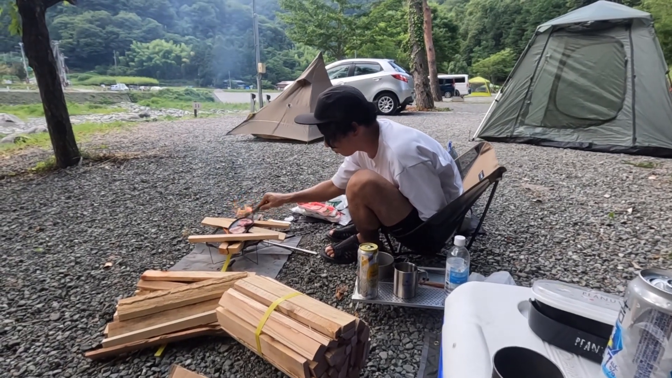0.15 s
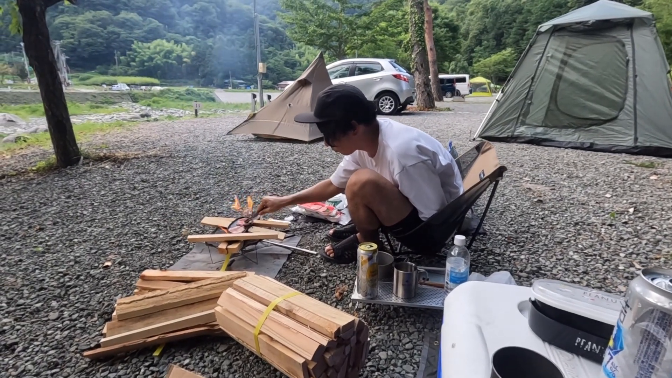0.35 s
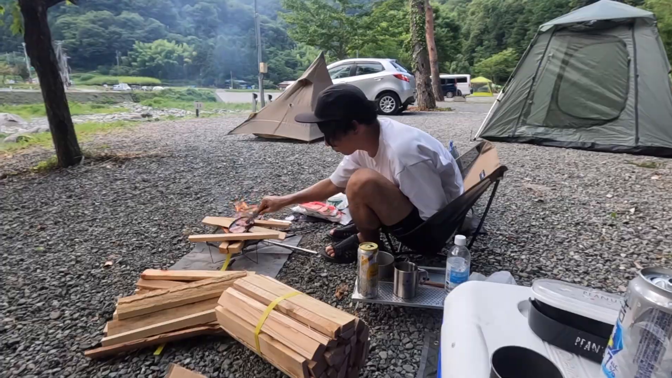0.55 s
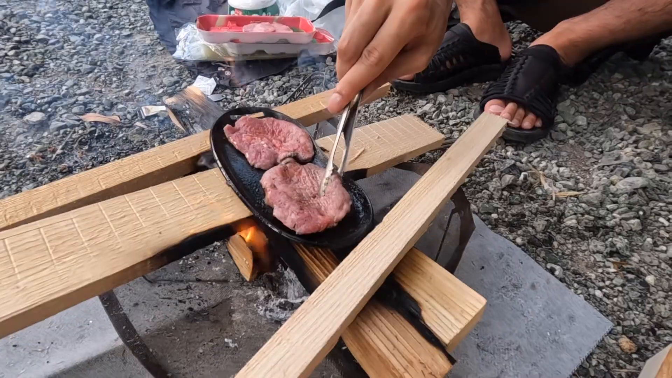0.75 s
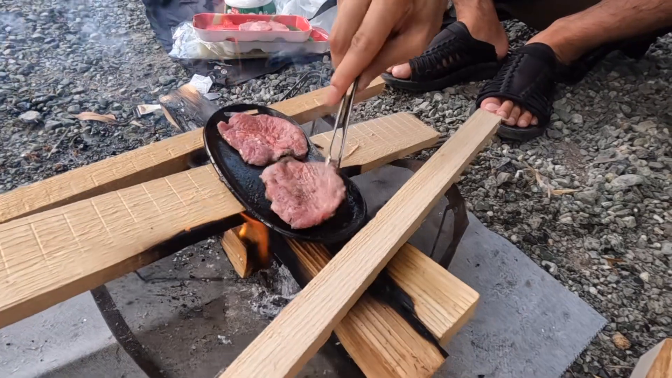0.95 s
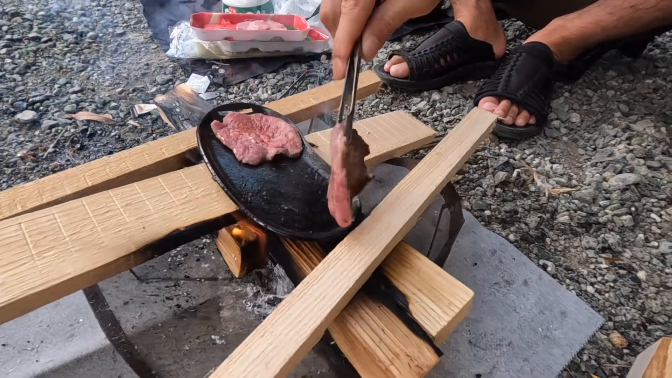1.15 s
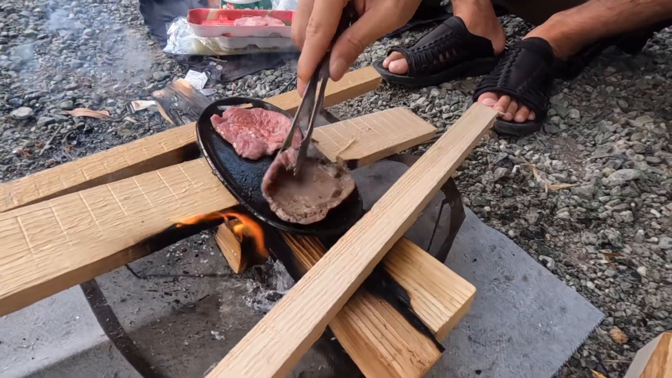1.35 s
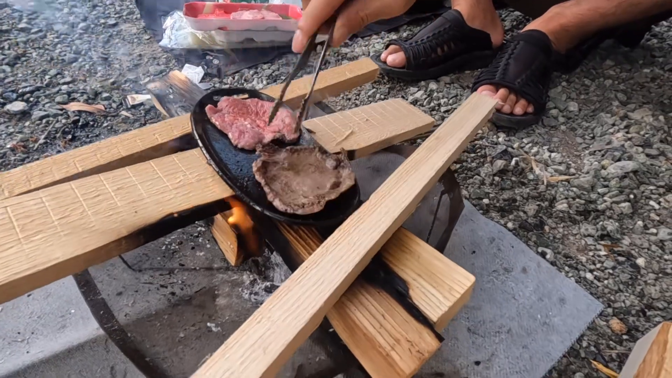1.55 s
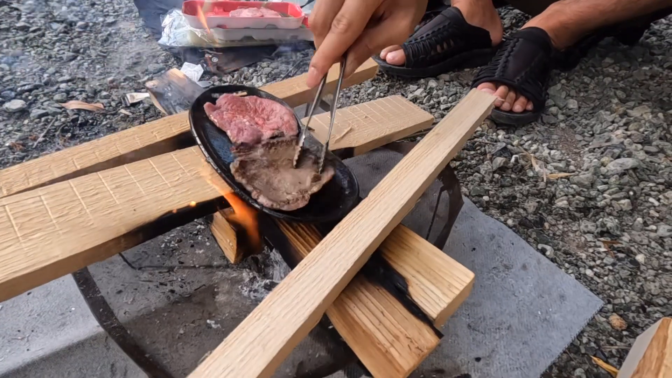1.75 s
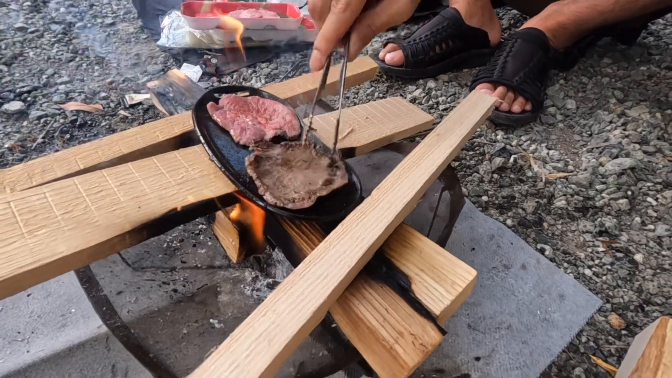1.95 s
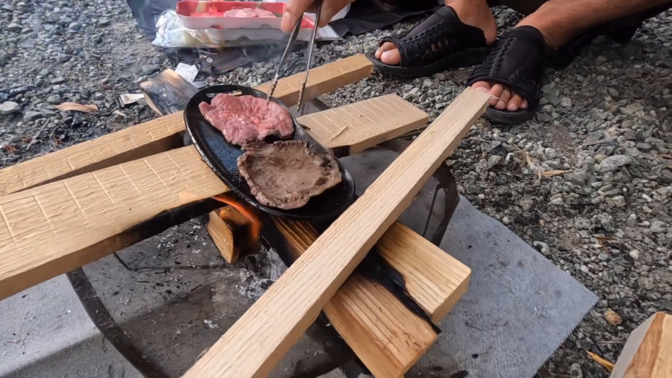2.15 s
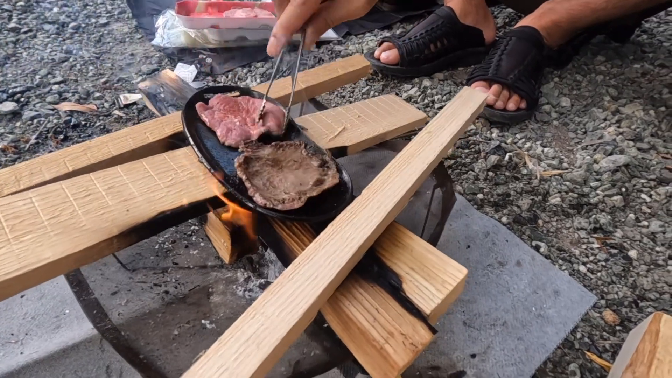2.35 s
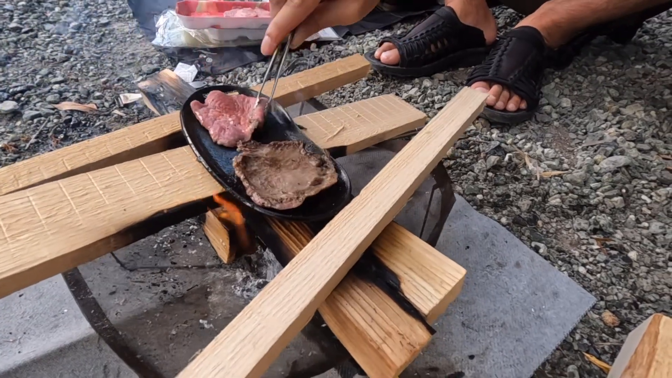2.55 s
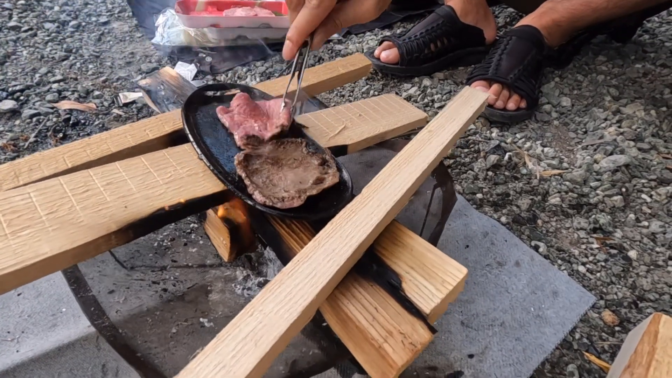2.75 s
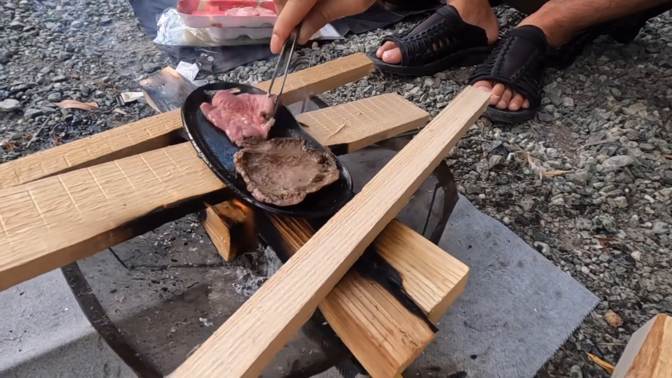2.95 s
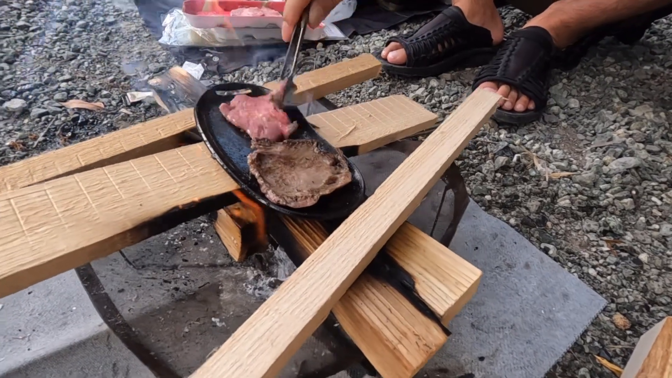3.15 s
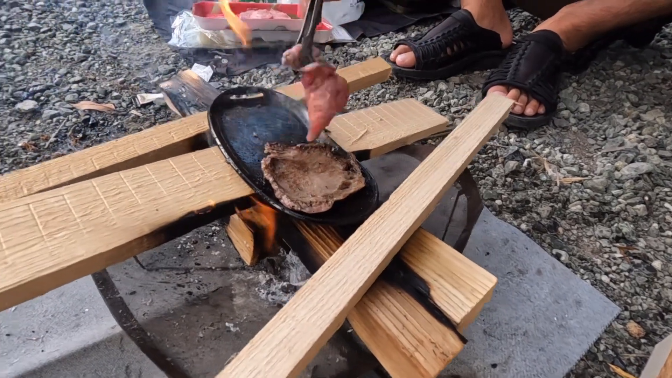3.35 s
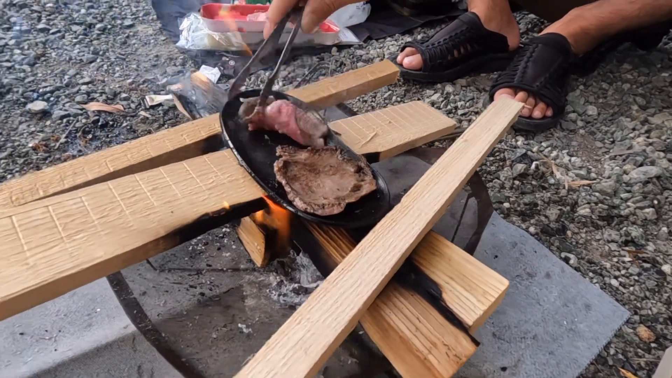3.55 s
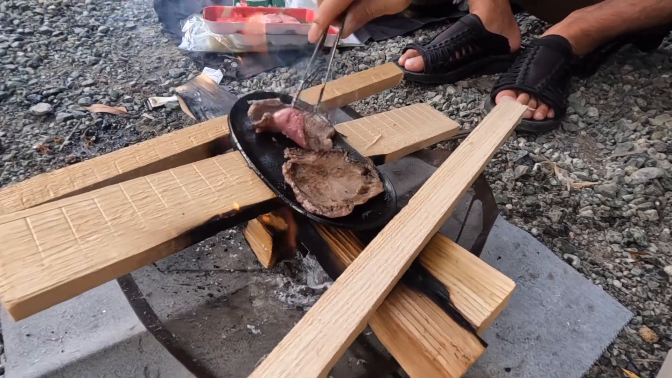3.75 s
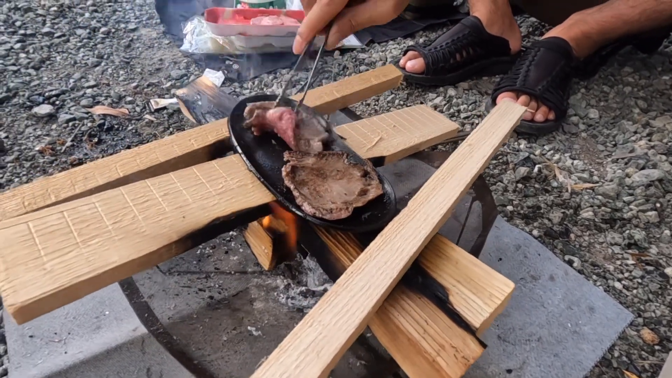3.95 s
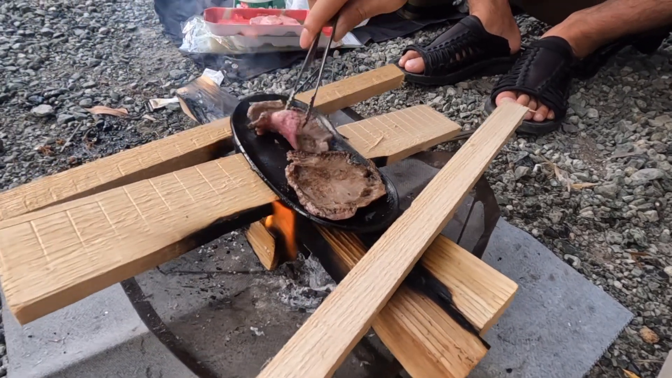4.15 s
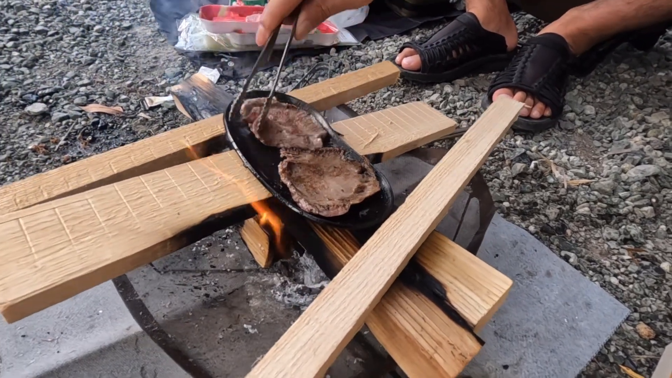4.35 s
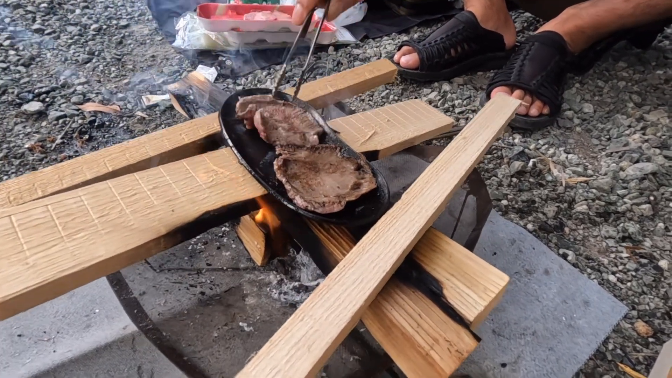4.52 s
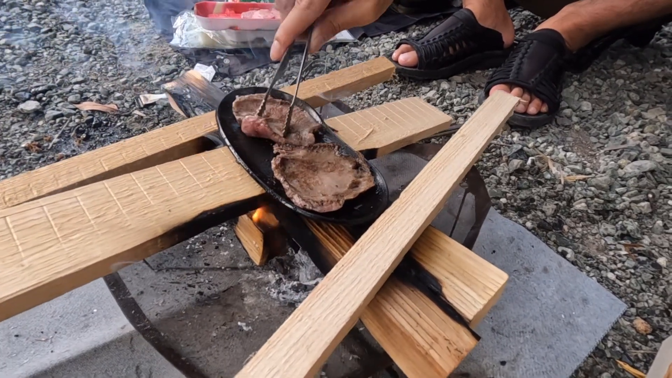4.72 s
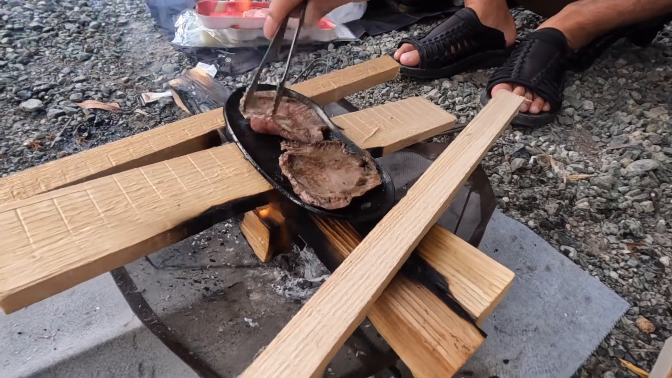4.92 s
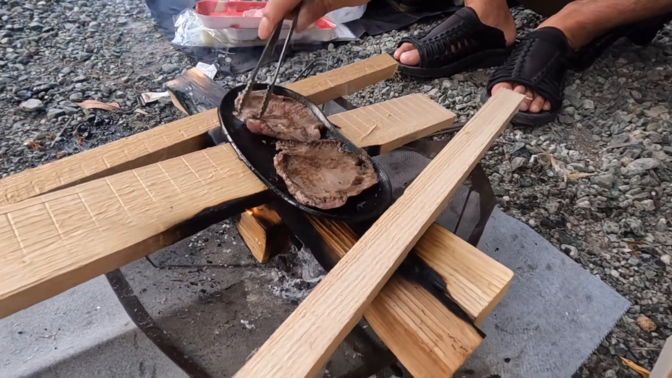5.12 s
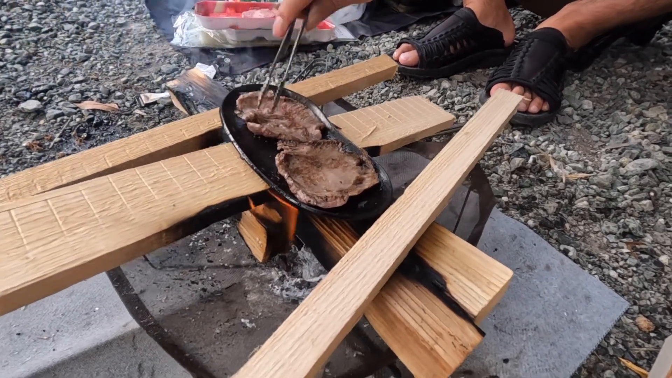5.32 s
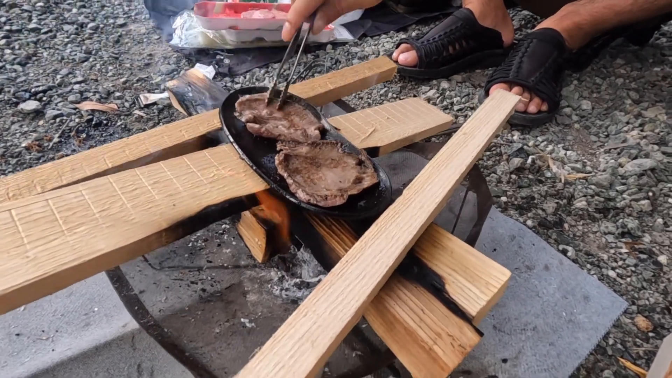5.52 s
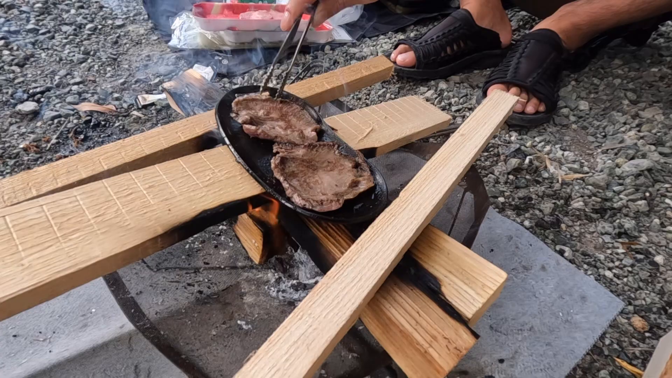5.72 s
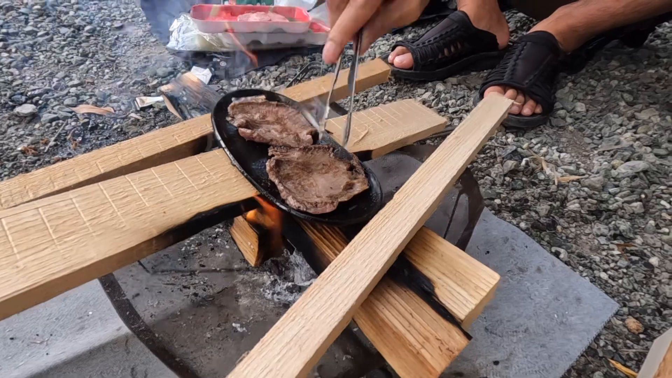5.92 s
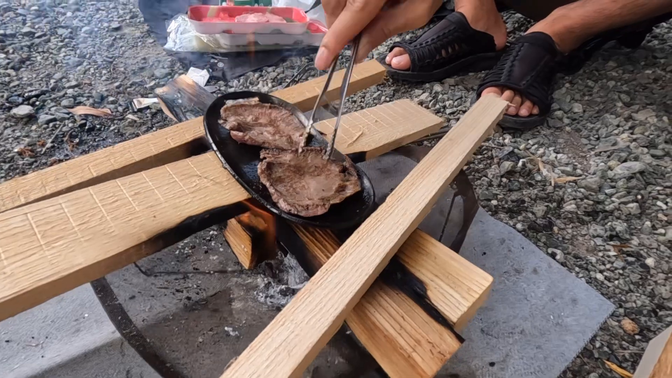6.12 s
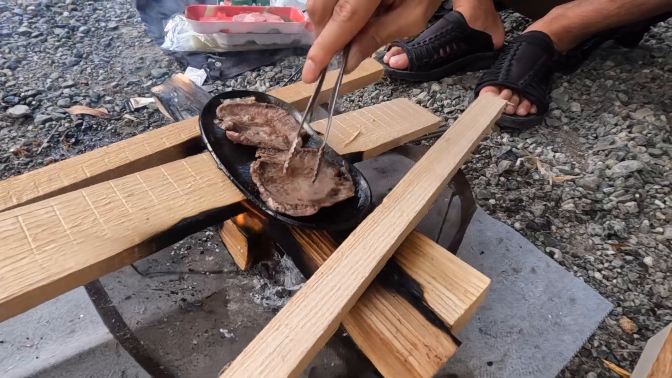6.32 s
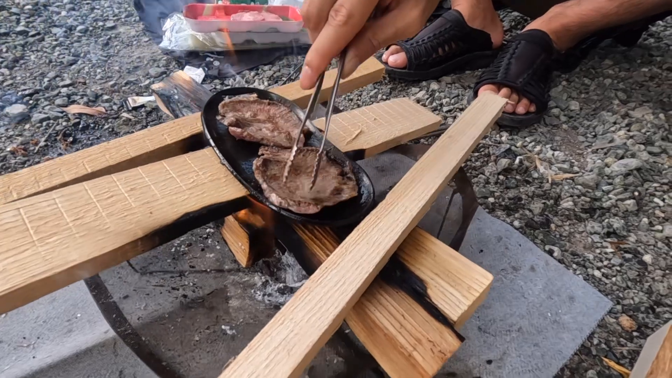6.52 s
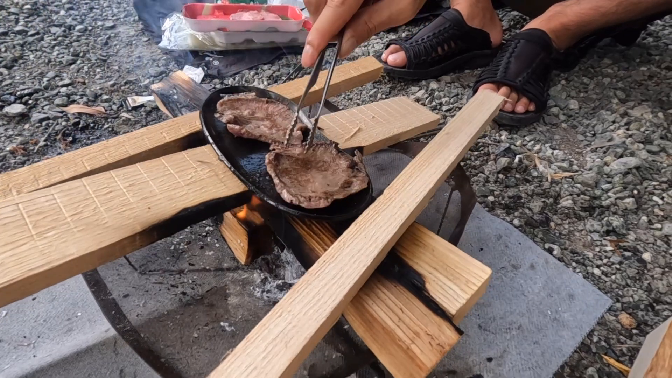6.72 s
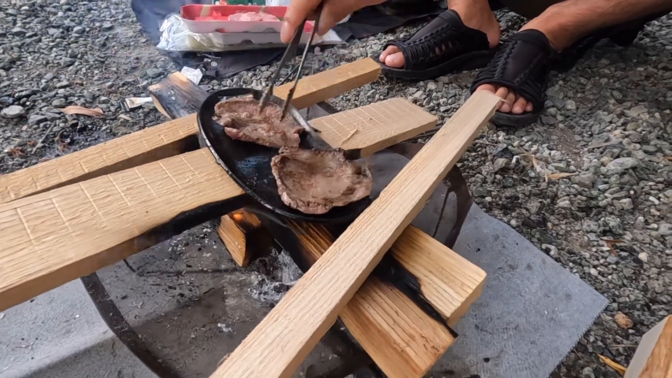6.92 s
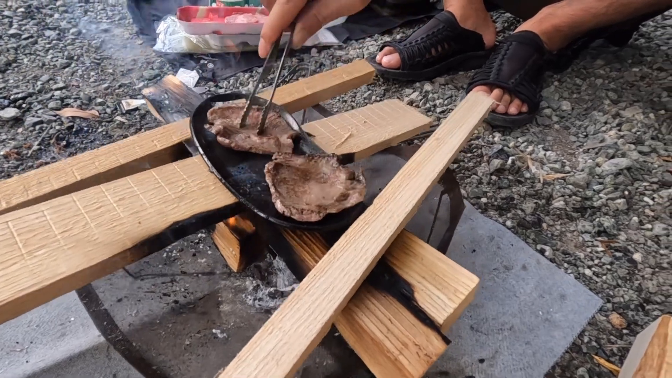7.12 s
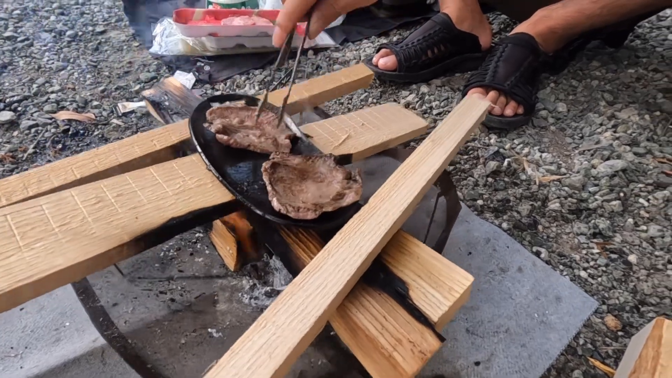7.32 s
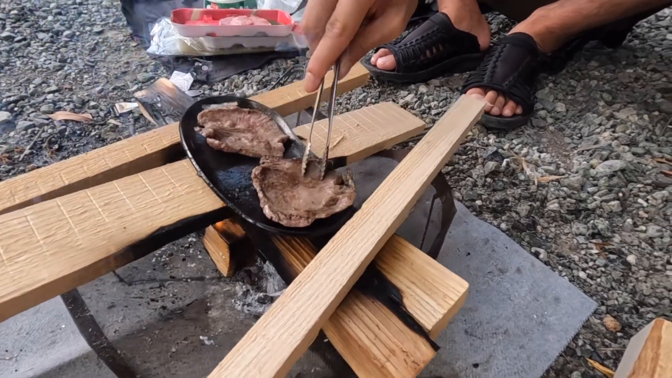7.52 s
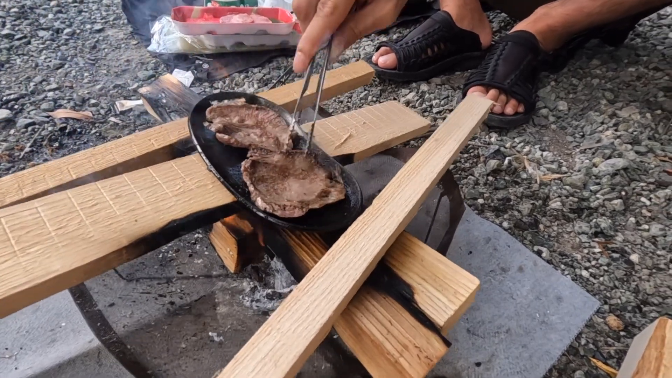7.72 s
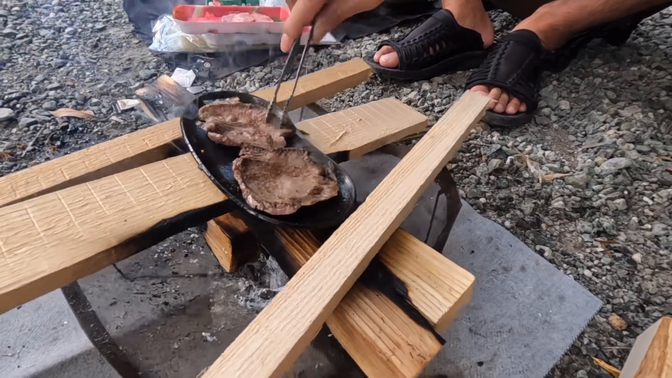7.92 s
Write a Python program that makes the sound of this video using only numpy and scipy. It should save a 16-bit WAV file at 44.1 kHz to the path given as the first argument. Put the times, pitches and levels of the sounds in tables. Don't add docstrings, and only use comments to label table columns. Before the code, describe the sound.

Meat fries on a campfire skillet: crackling drops first, then fierce spitting and bubbling juices, with low wind rumble and a soft river-like hush.

```python
import sys
import numpy as np
from scipy import signal
from scipy.fft import rfft, irfft
from scipy.io import wavfile
from scipy.ndimage import uniform_filter1d

SR = 44100
rng = np.random.default_rng(int(sys.argv[2]) if len(sys.argv) > 2 else 0)


def volts(x):
    e = np.asarray(x, float) / 20
    return 10 ** e


def to_wav(sig):
    pcm = np.clip(np.atleast_2d(sig), -1, 1) * 32767
    pcm = np.round(pcm).astype(np.int16)
    wavfile.write(sys.argv[1], SR, pcm.T)


N = 355887
HZ = np.fft.rfftfreq(N, 1 / SR)
T = np.arange(N) / SR
CLOSE_S = .68


# (time [s], spitting fat [dB], brightness [dB])
CONTACT = [(.68, -36, -7), (1.385, -36, -6), (1.4, -31, -8), (2.45, -33.5, -5.3), (2.85, -29.5, -7),
           (3.2, -32, -7.5), (3.3, -34.5, -6), (3.56, -35.5, -8), (3.585, -22.8, -10.5), (4.0, -24.5, -10),
           (4.72, -28.5, -9), (4.77, -28.5, -5.7), (5.1, -30.5, -5.5), (5.6, -29.5, -5), (6.7, -28.3, -7),
           (7.54, -30, -6.5), (7.61, -27.5, -7), (8.07, -28, -7.5)]
# (time [s], hold [s], fat level [dB])
PRESSES = [(1.14, .09, 2.5), (1.395, .04, 2.5), (1.735, .025, 4.5), (1.8, .115, 4), (2.55, .07, 3.5),
           (2.67, .04, -3), (2.745, .03, 5), (3.11, .04, 2), (3.53, .015, 7), (3.93, .05, -2),
           (4.64, .07, 3), (5.44, .04, -3.5), (5.56, .06, 1.5), (5.94, .04, -2.5), (6.27, .03, 2),
           (7.07, .04, -1.2), (7.82, .1, -2)]
# (time [s], hold [s], level [dB])
JUICE_RUNS = [
    (1.38, 7, 7.3),
    (1.41, .22, 2.5),
    (1.85, .35, -1.5),
    (3.5, 1.0, -2),
    (4.62, 4, .5),
    (4.62, .25, 1),
    (4.62, .8, 1.3),
    (6.42, 1.1, 1.5),
]


def pan_levels():
    fat_db, bright_db = columns(CONTACT)
    press_db = bumps(PRESSES, rise_s=.015, fall_s=.025)
    juice_db = -42.3 + bumps(JUICE_RUNS, rise_s=.13, fall_s=1) + .15 * press_db
    return fat_db + press_db + creep(), bright_db - .3 * press_db, juice_db + creep()


# (frequency [Hz], level [dB/Hz])
SPIT = [(3300, -37), (3950, -25), (4300, -5), (5700, -0.5), (7700, -4.5), (8200, -11), (8700, -14.5),
        (10100, -8.5), (11200, -16), (12000, -10), (13000, -22.5), (14200, -30), (15800, -20)]


def spitting(fat_db, bright_db):
    fat = coloured(bubbles(3500, 14400, per_s=17000, spread_db=2.5, cycles=.6, count=8), SPIT)
    flurries_db = .5 * wander(19) + .5 * wander(330)
    fat = lifted(fat * volts(flurries_db), 7800, 1200, bright_db + 10.0)
    narrow_db = 1.3 * np.maximum(-7.5 - bright_db, 0)
    fat = lifted(fat, 4200, 1100, narrow_db) * volts(-.85 * narrow_db)
    return fat * volts(fat_db + 1.96)


# (frequency [Hz], level [dB/Hz])
SIMMER = [(440, -39.5), (750, -15.5), (840, -19), (928, -6), (1000, -4.5), (1220, -1.5), (1730, -2),
          (1940, 0.5), (3090, -8), (3580, -3), (3900, -6), (4100, -3), (5330, -13.5), (9020, -120)]


def simmering(fat_db, juice_db):
    juice = -coloured(bubbles(880, 5500, per_s=9000, spread_db=2.0, cycles=0.61, count=8), SIMMER)
    leak_db = 0.35 * uniform_filter1d(fat_db - juice_db - 2.5, size=6000)
    juice = lifted(juice, 2340, 300, leak_db)
    return juice * volts(juice_db + 0.83 + 0.32 * wander(40))


def crackling(fat_db):
    drops = volts(2.6 * np.minimum(rng.exponential(1, N), 3.5)) * (rng.random(N) < 600 / SR)
    kind = rng.integers(0, 4, N)
    crackle = sum(signal.oaconvolve(drops * (kind == k), tick(hz, -9))[:N]
                  for k, hz in enumerate([4490, 5830, 5760, 7160]))
    return housed(crackle * volts(-35 + .77 * (fat_db + 40)))


def frying():
    fat_db, bright_db, juice_db = pan_levels()
    return spitting(fat_db, bright_db) + simmering(fat_db, juice_db) + crackling(fat_db)


# (time [s], peak [dB], pitch [Hz], low knock [dB])
POPS = [(1.6194, -18, 4010, -6), (1.8395, -15, 5810, -11), (1.8499, -16, 5730, -18),
        (1.8697, -16, 5680, -13), (1.9151, -16, 6290, -15), (1.9482, -18, 6630, -9),
        (2.0473, -18, 5730, -6), (2.2512, -18, 6070, -9), (2.5904, -16, 6720, -21), (2.603, -15, 5990, -18),
        (2.7119, -16, 5380, -19), (2.7577, -14, 7150, -17), (3.1282, -16, 5640, -13),
        (3.176, -14, 6070, -11), (3.2728, -16, 7280, -13), (3.4873, -16, 5080, -9),
        (3.5856, -10, 6290, -22), (3.6032, -10, 5470, -17), (4.1174, -9, 5900, -24),
        (4.1279, -11, 5250, -18), (4.8881, -11, 7060, -13), (5.5113, -13, 5170, -10),
        (5.5262, -13, 5510, -15), (6.2782, -12, 5300, -7), (7.0283, -11, 5470, -13),
        (7.1042, -12, 5990, -10), (7.6023, -11, 4910, -12), (7.8309, -12, 5300, -14),
        (7.8651, -9, 5430, -10), (7.985, -9, 5810, -19)]
# (time [s], peak [dB], pitch [Hz])
DROPS = [(.7032, -26, 6630), (.7284, -20, 5990), (.7511, -27, 7490), (.7595, -26, 5680), (.7868, -27, 4610),
         (.8034, -27, 6420), (.8203, -25, 5900), (.8236, -18, 5210), (.8473, -24, 4650), (.861, -19, 6120),
         (.8802, -21, 5640), (.8855, -25, 4910), (.9064, -26, 6070), (.9391, -25, 4820), (.9508, -26, 6160),
         (.9626, -25, 5210), (.9655, -26, 5600), (1.1763, -19, 6200), (1.2053, -23, 5940),
         (1.2115, -23, 5990), (1.2238, -24, 4440), (1.2316, -24, 5560), (1.2394, -23, 5640),
         (1.275, -24, 5210), (1.2887, -19, 5040), (1.3577, -22, 4690), (1.384, -19, 5120),
         (1.3907, -18, 5210), (1.4126, -17, 5900)]


def pops():
    out = np.zeros(N + 400)
    drop_knock_db = -13
    for s, db, hz, low_db in [(*row, drop_knock_db) for row in DROPS] + list(POPS):
        out[round(s * SR) - 6:][:400] += volts(db + .3) * tick(hz, low_db)
    out = out[:N] + 0.068 * np.roll(out[:N], shift=14)
    return housed(out)


def burst(hz, cycles):
    u = np.arange(400) / SR * hz
    return np.sin(2 * np.pi * u * (1 + 0.033 * u)) * (1 - np.exp(-u / 0.33)) * np.exp(-u / cycles)


def tick(hz, low_db):
    ring = burst(.95 * hz, 1) - 1.45 * volts(low_db) * np.roll(burst(1900, .6), shift=3)
    ring = ring + .16 * np.roll(burst(11500, 4), shift=6)
    return ring / abs(ring).max()


def bubbles(lo_hz, hi_hz, per_s, spread_db, cycles, count=18):
    size = volts(spread_db * np.minimum(rng.exponential(1, (2, N)), 4.4))
    size = size * (rng.random((2, N)) < per_s / SR)
    kind = rng.integers(0, count, (2, N))
    pitches = np.geomspace(lo_hz, hi_hz, count)
    return sum(signal.oaconvolve(size * (kind == k), np.sqrt(f) * burst(f, cycles)[None], axes=1)[:, :N]
               for k, f in enumerate(pitches))


# (frequency [Hz], gain [dB])
HOUSING = [(600, -12), (1500, 0), (2400, 0), (3100, -12), (4300, 0), (7500, 0), (8600, -7), (12000, -2),
           (13500, -14), (15000, -26)]


def housed(x):
    return np.array([irfft(rfft(x) * volts(read(HOUSING)), N), 0 * x])


# (frequency [Hz], level [dB/Hz])
FAR_LOW = [(600, -25), (850, -6), (1300, -2.5), (2200, -3), (2550, -12), (2850, -5.5), (3200, -14),
           (4150, -5), (4500, -9), (4800, -33)]
# (frequency [Hz], level [dB/Hz])
FAR_HIGH = [(4300, -29), (4650, 1), (6000, 0), (7800, -1), (8900, -6), (11200, -12), (11800, 1.5),
            (13500, -4), (14500, -14), (15700, -23)]
# (time [s], hold [s], level [dB])
STIRS = [
    (-.05, .12, 5),
    (.4, .27, 3),
    (.51, .04, 7),
]


def afar():
    treble_db = -11.5 + bumps(STIRS, rise_s=.02, fall_s=.05)
    wash = coloured(bubbles(860, 5500, per_s=9000, spread_db=-1.0, cycles=1.15), FAR_LOW)[0]
    treble = coloured(rng.standard_normal((2, N)), FAR_HIGH)
    apart = irfft(rfft(treble[1]) * (HZ > 11300), N) * np.array([[.7], [-.7]])
    return (wash + (treble[0] + apart) * volts(treble_db)) * volts(-46.7)


# (time [s], peak [dB], pitch [Hz], t60 [s])
THUMPS = [
    (.304, -19, 35, .13),
    (3.2115, -26, 41, .12),
]


def thumps():
    out, t = np.zeros(N), np.arange(SR // 4) / SR
    for s, db, hz, t60_s in THUMPS:
        swing = np.sin(2 * np.pi * hz * (t + 0.0064 * (1 - np.exp(-t / 0.0073))))
        push = volts(db + 10.5 - 60 * t / t60_s) * (1 - np.exp(-t / 0.016)) * swing
        rattle = np.sin(2 * np.pi * 430 * t) + 2.4 * np.sin(2 * np.pi * 150 * t)
        out[round(s * SR):][:len(t)] += push + volts(-42 - 60 * t / 0.094) * rattle
    return out


# (frequency [Hz], level [dB/Hz])
BUFFET = [(8.8, -48), (15, 2.5), (32, 1), (65, -1.5), (150, -9.5), (220, -24), (260, -21.5), (340, -37),
          (570, -120)]
# (time [s], hold [s], level [dB])
GUSTS = [(.0, .15, 5), (.34, .13, 8), (.56, .1, 2), (1.4, .35, 2.5), (2.03, .15, 2), (2.55, .1, 2),
         (3.25, .25, 5), (3.5, .25, 1.5), (4.0, .15, 2), (4.35, 1.0, 2), (4.9, .9, 1.5), (6.12, .05, -3),
         (6.62, .1, 5), (6.84, .08, -2), (7.1, .15, 3), (7.72, .3, 1)]


def buffeting():
    buffet_db = np.where(T < CLOSE_S, -46, -40.3 + creep()) + bumps(GUSTS, rise_s=.05, fall_s=.08)
    buffet_db = buffet_db - sum(12 * np.exp(-((T - s - .02) / .025) ** 2) for s, *_ in THUMPS)
    return coloured(rng.standard_normal((2, N)), BUFFET) * volts(buffet_db + .6 * wander(15))


# (frequency [Hz], level [dB/Hz])
HUSH = [(110, -32.5), (180, -9.5), (264, -5.5), (547, -10), (593, -9.5), (702, -13), (900, -9),
        (1170, -34.5), (1980, -120)]
# (time [s], hold [s], level [dB])
SWELLS = [
    (.12, .12, 1),
    (.45, .2, 1),
    (1.0, .12, 1.5),
    (1.95, .3, 1.2),
    (4.35, .25, 1.5),
    (6.46, .06, 2),
    (6.76, .5, 2.5),
]
# (frequency [Hz], level [dB/Hz])
HISS = [(10500, -40), (11500, -8), (12000, -11), (13000, 5), (14200, -5), (15800, -20)]


def river():
    hush_db = np.where(T < CLOSE_S, -52.8, -49 + creep()) + bumps(SWELLS, rise_s=.05, fall_s=.08)
    hiss = coloured(rng.standard_normal((2, N)), HISS) * volts(-54) * (T > CLOSE_S)
    return hiss + coloured(rng.standard_normal((2, N)), HUSH) * volts(hush_db - 0.06)


# (frequency [Hz], likeness [0-1])
SAME = [(30, .8), (70, .8), (140, .6), (500, .72), (800, .8), (1200, .95), (2500, .86), (4500, .98),
        (6300, .998), (9500, .996), (10800, .97), (12000, .68), (14000, .62)]
# (frequency [Hz], phase [rad])
LEAD = [(30, 0), (900, -.1), (1290, -.3), (2330, -1.4), (3010, -1.7), (3360, -.5), (3790, -.5), (4050, 0),
        (16000, 0)]
# (frequency [Hz], level [dB])
TILT = [(60, 0), (160, -1), (500, 1), (1800, 0), (2740, -5.5), (3400, -12.5), (4190, -4), (5400, -4),
        (6400, 0.9), (11000, 2.4), (13000, -1)]


def ports(pair):
    a, b = rfft(pair)
    same = np.clip(read(SAME), 0, 1)
    shared, apart = np.sqrt((1 + same) / 2) * a, np.sqrt((1 - same) / 2) * b
    half = volts(read(TILT) / 2) * np.exp(.5j * read(LEAD))
    left, right = (shared + apart) * half, (shared - apart) / half
    mid_power = abs(half + 1 / half) ** 2 * (1 + same) / 8 + abs(half - 1 / half) ** 2 * (1 - same) / 8
    return irfft(np.array([left, right]) / np.maximum(np.sqrt(mid_power), .4), N)


def creep():
    return -10 * np.exp(-np.maximum(T - CLOSE_S, 0) / 2.2)


def bumps(rows, rise_s, fall_s):
    return sum(db * np.clip(np.minimum((T - s) / rise_s, 1 + (s + rise_s + hold_s - T) / fall_s), 0, 1)
               for s, hold_s, db in rows)


def columns(rows):
    s, *values = np.transpose(rows)
    return [np.interp(T, s, v) for v in values]


def read(points, hz=HZ):
    f, value = np.transpose(points)
    return np.interp(np.log(hz + 1), np.log(f + 1), value)


def evened(x):
    return x / np.sqrt(np.mean(x ** 2) + 1e-20)


def wander(per_s, count=2):
    z = rfft(rng.standard_normal(N)) / (1 + (HZ / per_s) ** count)
    return evened(irfft(z * (HZ > 2), N))


def coloured(x, spectrum):
    hz = np.fft.rfftfreq(4096, 1 / SR)
    own_db = 10 * np.log10(signal.welch(x[0], SR, nperseg=4096)[1] + 1e-20)
    gain_db = np.maximum(read(spectrum, hz), -90) - uniform_filter1d(own_db, size=25)
    log_gain = np.log(volts(gain_db))
    circle = np.r_[log_gain, log_gain[-2:0:-1]]
    taps = np.fft.ifft(np.exp(np.conj(signal.hilbert(circle)))).real
    return evened(signal.oaconvolve(x, taps[None], axes=1)[:, :N])


def lifted(x, from_hz, over_hz, db):
    return x + irfft(rfft(x) * np.clip((HZ - from_hz) / over_hz, 0, 1), N) * (volts(db) - 1)


def scene():
    air = buffeting() + river()
    near = ports(frying() + pops() + air)
    return np.where(T < CLOSE_S, afar() + air[0], near) + thumps()


def low_pass(x):
    return signal.sosfilt(signal.butter(12, 15600, fs=SR, output="sos"), x)


def record(dry):
    return low_pass(dry)


dry = scene()
out = record(dry)
to_wav(out)
```